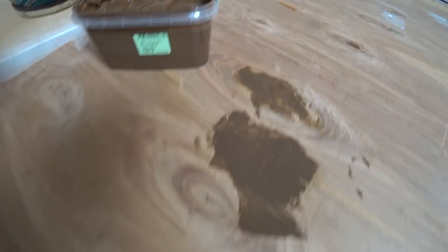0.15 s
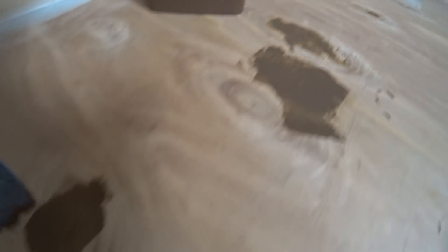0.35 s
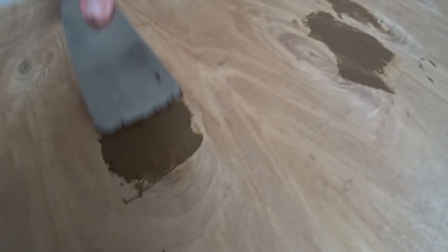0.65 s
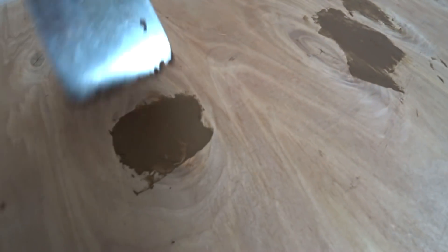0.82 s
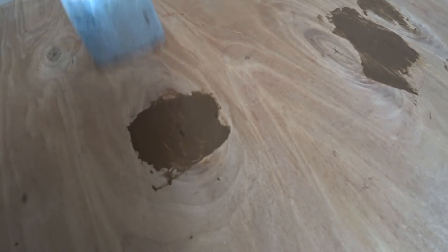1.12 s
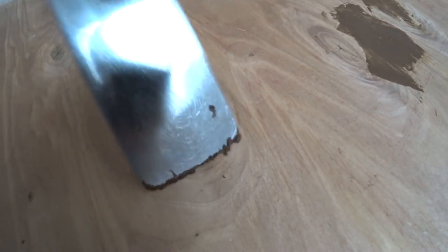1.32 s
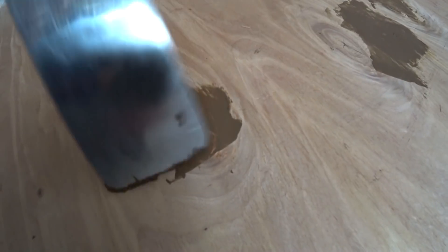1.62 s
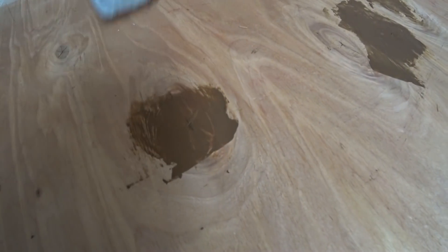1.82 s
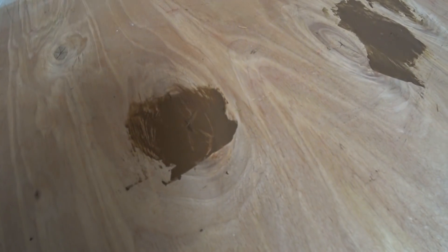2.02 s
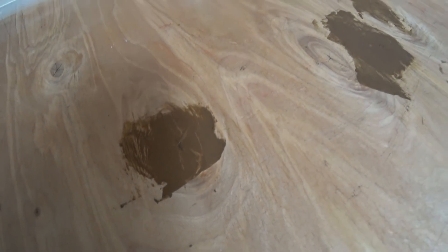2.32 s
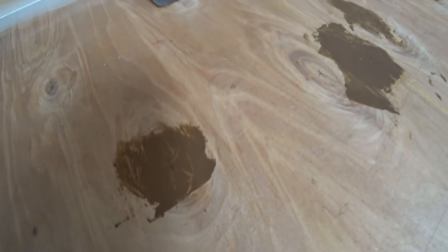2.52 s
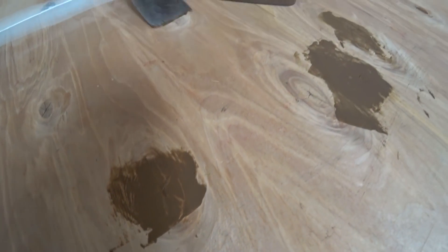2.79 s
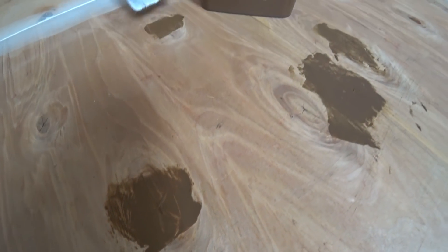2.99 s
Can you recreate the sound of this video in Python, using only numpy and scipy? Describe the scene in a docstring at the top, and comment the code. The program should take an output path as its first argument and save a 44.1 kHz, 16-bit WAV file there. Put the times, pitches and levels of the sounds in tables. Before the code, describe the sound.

A steel putty knife works filler into a wooden floor: nine clacking landings, each followed by a short gritty scrape. The first five are close to the stereo microphone; the last four sound roomier in a quiet bare room.

```python
"""A steel putty knife works filler into a wooden floor in a bare room, close to a stereo microphone.
Five strokes are near; four more landings, strong in the middle pitches, follow with more room in them,
most with a fading drag. Each landing rings board modes under a noisy clack; each drag is gritty noise
with sliding resonances, and a decaying tone marks the lift-off. Two edge snaps and a quiet hush
complete the place. A limiter holds the peaks down and a steep low-pass closes the top."""
import sys
import numpy as np
from scipy import signal
from scipy.fft import rfft, irfft, next_fast_len
from scipy.io import wavfile
from scipy.ndimage import uniform_filter1d, map_coordinates

SR = 44100
rng = np.random.default_rng(int(sys.argv[2]) if len(sys.argv) > 2 else 0)


def transcribe(signal):
    """Save signal, clipped to [-1, 1], as a 16-bit WAV file at the path in sys.argv[1]."""
    frames = np.atleast_2d(signal).T
    limited = np.clip(frames, -1, 1)
    pcm = np.round(limited * 32767).astype(np.int16)
    wavfile.write(sys.argv[1], SR, pcm)


N = 138915

# Blade landings: start_s, board_db, spot_hz (pitch the spot favours), spot_db, clack_db, room_db,
# left_right_db, bass_db, clack_tilt_db_per_octave, ring_length_ratio, upper_modes_db
LANDINGS = [(.0143, -28, 1320, 8, -12.5, -5, 7, -11, 3.5, .9, 3),
            (.5410, -24.5, 220, 4.5, -11, -12.5, 2.5, -1, 3.5, 0.64, 7.5),
            (.9422, -19, 670, 4.5, -11.5, -7.5, 2, 3, 4, 0.51, 6),
            (1.2930, -22.5, 345, 12.5, -18, -2.5, 2, 8, 1, 0.56, 1.5),
            (1.6054, -21, 356, 11, -11.5, -5, 2.5, 9, -1, 0.53, 3.5),
            (2.1189, -29, 842, 15, -15.5, -3, 1.5, -4, 5, 1.1, 0.5),
            (2.437, -27, 810, 17, -14, -0.5, 1, 0, 4.5, 0.79, 0.5),
            (2.7313, -26, 863, 14, -11, -0.5, 1, -6, 6, 0.9, 1.5),
            (3.0470, -32.5, 895, 20.5, -10.5, 4.5, 3.5, 5, 4, 0.71, -1.5)]
# Floorboard modes: pitch_hz, level_db, t60_s (before the ring length ratio), after_ring_db (re the mode)
BOARD_MODES = [(63, -19.5, 0.27, -28), (80, -21, .15, -30), (145, -15.5, 0.17, -20),
               (168, -12.5, 0.074, -27), (216.3, 4, 0.086, -34.5), (263, 0.5, 0.14, -22.5),
               (318, 1, 0.092, -23), (383.5, 0, 0.045, -17), (528, 0, 0.069, -27), (589, -3, 0.11, -27.5),
               (663, 2.5, 0.071, -22.5), (746.7, -2, 0.083, -20), (837, -12.5, 0.086, -22),
               (917, -10.5, 0.066, -20), (1148.6, 1, 0.044, -22), (1268, -3, 0.056, -33.5)]
# Share of a landing's bass gain: pitch_hz, share
BASS_SHARE = [(140, 0.51), (260, 0.023)]
# Share of a landing's upper-mode gain: pitch_hz, share
UPPER_SHARE = [(850, 0), (1100, 1)]
# Steel blade pressed on wood: pitch_hz, level_db, t60_s
BLADE_MODES = [(2420, -13.5, 0.011), (3180, -15.5, .03), (3964, -16, 0.077)]
# Noise spectrum of the clack: frequency_hz, level_db
CLACK_SPECTRUM = [(150, -23), (500, 10.5), (1200, -0.5), (1700, 1), (2600, -1), (4000, -6), (6000, -12.5),
                  (8000, -21), (11000, -29.5)]

# Drags: start_s, length_s, level_db at the start, after a third, after two thirds and at the end,
# left_right_db, resonances_db, resonance_pitch_ratio, tilt_db_per_octave, room_db
STROKES = [(0.06, 0.13, -32, -30.5, -28, -26, 4.5, -6, 0.95, 0.5, -8.5),
           (.563, 0.15, -24.5, -39, -32.5, -29, 2.5, -2, 1.07, 0, -9.5),
           (0.982, .120, -22.5, -21, -23, -23.5, 2.5, 0, 0.96, 0, -10),
           (1.333, 0.12, -23.5, -22.5, -25.5, -27, 2, -3, 1, 0.5, -10.5),
           (1.644, .120, -27.5, -24.5, -24.5, -22.5, 2.5, -1, 1.036, 1, -9),
           (2.153, 0.16, -36, -38.5, -38.5, -56, -11, -7, 0.81, .5, -1.5),
           (2.453, .150, -34.5, -30, -33.5, -40, 2, -14, 1.2, -0.5, -4.5),
           (2.744, 0.16, -28, -29.5, -36.5, -45, 1.5, -10, 1.0, .5, -2),
           (3.055, 0.095, -34, -29.5, -34, -28, 4, 2.5, 0.88, 2, 0.5)]
# Rasp of the paste: frequency_hz, level_db
RASP_SPECTRUM = [(30, -11.5), (110, -16.5), (220, -8.5), (355, 0.5), (490, -5.5), (730, -1), (900, -6.5),
                 (1150, -2), (1500, -5), (2100, -3), (3100, -11), (4100, -5.5), (4900, -8.5), (5800, -8),
                 (7300, -14), (8400, -14.5), (11000, -21)]
# Resonances that slide as the blade flattens, before a stroke's pitch ratio and gain:
# start_hz, turn_hz, end_hz, knots_per_s of the random envelope that widens them, level_db
SLIDING_MODES = [(2472, 2580, 1750, 260, -3.5), (3195, 3650, 2700, 420, -7), (5370, 5800, 5100, 700, -12.5)]

# Snaps of the blade's edge over grit: start_s, level_db
EDGE_SNAPS = [(2.1495, -8.5), (2.9948, -40.5)]
# Noise spectrum of a snap: frequency_hz, level_db
SNAP_SPECTRUM = [(300, -19), (2000, -8), (3800, -2), (6000, -3.5), (8000, -5.5), (11000, -5.5)]

# Decay of the bare room: frequency_hz, t60_s
ROOM_DECAY = [(100, 0.25), (260, 0.42), (700, 0.38), (1840, 0.4), (4850, 0.39), (11000, 0.35)]
# Left-right likeness of the room's answer: frequency_hz, correlation
ROOM_LIKENESS = [(100, 0.96), (500, 0.92), (1100, 0.59), (2500, 0.56), (5000, 0.66), (11000, 0.49)]
# Left-right likeness of the direct sound and the hush: frequency_hz, correlation
NEAR_LIKENESS = [(300, 0.79), (1100, 0.75), (2500, 0.77), (5000, 0.89), (11000, 0.47)]
# Share of the left-right level difference: frequency_hz, share
SIDE_SHARE = [(600, -0.047), (1100, -0.77), (2000, 1.58), (11000, 1.77)]
# Spectrum of the quiet place: frequency_hz, level_db
HUSH_SPECTRUM = [(25, 1.5), (60, -5), (150, -8.5), (500, -10.5), (2000, -19), (10000, -22.5)]

CONTACT_S = 0.00023  # time constant of the rise of a knock or snap
SPOT_OCTAVES = 0.49  # half-width, to 1/e of the dB gain, of the band a spot favours
AFTER_T60_S = 0.36  # the floor's slow after-ring
CLACK_T60_S, SNAP_T60_S = 0.022, 0.023
DRAG_HALF_ATTACK_S, DRAG_RELEASE_S = 0.014, 0.0093
SLIDE_TURN = 0.57  # share of the drag at which the slide turns
JUDDER_DB, JUDDER_KNOTS_PER_S = 1, 174.4
SWELL_DB, SWELL_KNOTS_PER_S = 0.9, 34.7
LIFT_HZ, LIFT_DB, LIFT_T60_S = 3810, -8, 0.064  # level re the end of the drag
GRITS_PER_S, GRIT_SPREAD, HISS_SHARE = 5000, 0.4, 0.6  # spread: log amplitude; hiss: re grit rms 1
PATCHY_DB = 2.6  # rms of the colour shifts
SNAP_PAN_DB, SNAP_ROOM_DB = 2, -5
TILT_PIVOT_HZ = 2000
ROOM_BUILD_S = 0.0027
HUSH_DB = -61
LIMIT_DB, RECOVER_DB_PER_S = -2, 120
TOP_HZ = 11130


def knocks(t):
    """The blade lands: a steel clack, and board modes weighted by the spot that is struck."""
    out = np.zeros((2, N))
    rise = 1 - np.exp(-t / CONTACT_S)
    for (start, board_db, spot_hz, spot_db, clack_db, room_db,
         pan_db, bass_db, tilt_db, ringing, upper_db) in LANDINGS:
        wood = np.zeros(len(t))
        for k, (hz, db, t60, after_db) in enumerate(BOARD_MODES):
            octaves_off = np.log2(hz / spot_hz)
            favour_db = spot_db * np.exp(-(octaves_off / SPOT_OCTAVES) ** 2)
            favour_db += bass_db * along(BASS_SHARE, hz) + upper_db * along(UPPER_SHARE, hz)
            mode_gain = (-1) ** k * amp(db + favour_db + rng.normal(0, 1))  # alternating polarity
            ring = amp(-60 * t / (ringing * t60)) + amp(after_db - 60 * t / AFTER_T60_S)
            wood += mode_gain * ring * np.sin(2 * np.pi * hz * t)
        steel = np.zeros(len(t))
        for hz, db, t60 in BLADE_MODES:
            phase = 2 * np.pi * hz * t + 0.5 * wobble(t, 420)  # the unsteady phase roughens the tone
            steel += amp(db - 60 * t / t60) * np.sin(phase)
        clack = coloured(rng.standard_normal((2, len(t))), CLACK_SPECTRUM, tilt_db)
        clack = clack * amp(-60 * t / CLACK_T60_S)
        blow = (amp(board_db) * wood + amp(clack_db) * (steel + clack)) * rise
        add(out, start, placed(blow, pan_db, room_db))
    return out


def drags(t):
    """The blade judders over the paste, its resonances slide, and it rings as it lifts."""
    out = np.zeros((2, N))
    age = t - DRAG_HALF_ATTACK_S
    for (start, length, start_db, early_db, late_db, end_db,
         pan_db, slide_db, pitch, tilt_db, room_db) in STROKES:
        rasp = coloured(grit(t), RASP_SPECTRUM, tilt_db)
        for start_hz, turn_hz, end_hz, knots_per_s, db in SLIDING_MODES:
            times = [0, SLIDE_TURN * length, length]
            hz = pitch * np.interp(age, times, [start_hz, turn_hz, end_hz])
            phase = 2 * np.pi * np.cumsum(hz) / SR
            band = wobble(t, knots_per_s) * np.sin(phase) + wobble(t, knots_per_s) * np.cos(phase)
            rasp = rasp + amp(db + slide_db) * unit(band)
        press = np.clip(t / (2 * DRAG_HALF_ATTACK_S), 0, 1)
        release = np.clip(1 - (age - length) / DRAG_RELEASE_S, 0, 1)
        uneven_db = JUDDER_DB * wobble(t, JUDDER_KNOTS_PER_S) + SWELL_DB * wobble(t, SWELL_KNOTS_PER_S)
        level_db = np.interp(age, np.linspace(0, length, 4), [start_db, early_db, late_db, end_db])
        force = press * release * amp(level_db + uneven_db)
        free = np.maximum(age - length, 0)  # seconds since the drag ended
        lift = amp(end_db + LIFT_DB - 60 * free / LIFT_T60_S) * np.sin(2 * np.pi * LIFT_HZ * free)
        add(out, start - DRAG_HALF_ATTACK_S, placed(force * unit(rasp) + lift, pan_db, room_db))
    return out


def grit(t):
    """Dense tiny slips on a smooth hiss; their colour shifts in patches as the paste gives way."""
    shape = (2, len(t))
    hits = rng.random(shape) < GRITS_PER_S / SR
    signs = np.sign(rng.standard_normal(shape))
    slips = hits * signs * np.exp(GRIT_SPREAD * rng.standard_normal(shape))
    z = signal.stft(unit(slips) + HISS_SHARE * rng.standard_normal(shape), nperseg=256)[2]
    patches = uniform_filter1d(rng.standard_normal(z.shape[1:]), size=4, axis=0)  # over frequency
    patches = uniform_filter1d(patches, size=7, axis=1)  # over time
    return signal.istft(z * amp(PATCHY_DB * unit(patches)), nperseg=256)[1][:, :len(t)]


def snaps(t):
    """The blade's edge snaps over grit: bright noise that rises at once and dies exponentially."""
    out = np.zeros((2, N))
    for start, db in EDGE_SNAPS:
        click = coloured(rng.standard_normal((2, len(t))), SNAP_SPECTRUM)
        click = click * amp(db - 60 * t / SNAP_T60_S) * (1 - np.exp(-t / CONTACT_S))
        add(out, start, placed(click, SNAP_PAN_DB, SNAP_ROOM_DB))
    return out


def placed(x, pan_db, room_db):
    """Level differs by side and frequency at the microphone, and the room answers in decaying noise."""
    n = x.shape[-1]
    hz, t, z = signal.stft(rng.standard_normal((2, n)), SR, nperseg=256)
    decay = amp(-60 * t / along(ROOM_DECAY, hz)[:, None])
    build = 1 - np.exp(-t / ROOM_BUILD_S)
    tail = signal.istft(z * decay * build, SR, nperseg=256)[1]
    tail = unit(stereo(tail, ROOM_LIKENESS)) / np.sqrt(n)  # about unit energy a side
    wet = signal.fftconvolve(x.mean(0)[None], tail, axes=1)[:, :n]
    direct = filtered(x, lambda f: amp(np.outer([0.5, -0.5], pan_db * along(SIDE_SHARE, f))))
    return direct + amp(room_db) * wet


def hush():
    """The quiet of the place: steady stereo noise, strongest in the bass."""
    return amp(HUSH_DB) * coloured(rng.standard_normal((2, N)), HUSH_SPECTRUM)


def coloured(pair, spectrum, tilt_db=0):
    """Near stereo sound of rms 1 with a given spectrum, tilted by so many dB an octave."""
    def gain(hz):
        octaves = np.log2(np.maximum(hz, TILT_PIVOT_HZ / 10) / TILT_PIVOT_HZ)
        return amp(along(spectrum, hz) + tilt_db * octaves)
    return unit(stereo(filtered(pair, gain), NEAR_LIKENESS))


def stereo(pair, likeness):
    """Mix two unrelated signals as mid and side, to left and right of a given correlation."""
    def mid_side(hz):
        turn = np.arccos(np.clip(along(likeness, hz), -1, 1)) / 2
        return np.array([np.cos(turn), np.sin(turn)])
    mid, side = filtered(pair, mid_side)
    return np.array([mid + side, mid - side])


def wobble(t, rate):
    """A smooth random curve, rate knots a second."""
    return map_coordinates(rng.standard_normal(2048), [t * rate], mode="wrap")


def filtered(x, response):
    """Multiply the spectrum of x by a response of frequency."""
    n = x.shape[-1]
    m = next_fast_len(n + SR // 10)  # padding for the filter's ringing
    return irfft(rfft(x, m) * response(np.fft.rfftfreq(m, 1 / SR)), m)[..., :n]


def along(points, hz):
    """Interpolate (Hz, value) points on a log frequency axis."""
    f, v = np.transpose(points)
    return np.interp(np.log(hz + 1), np.log(f + 1), v)


def amp(db):
    """Decibels to gain."""
    return 10 ** (np.asarray(db) / 20)


def unit(x):
    """Scale to rms 1."""
    return x / np.sqrt(np.mean(x ** 2) + 1e-20)


def add(track, start_s, x):
    """Mix x into the track at a time in seconds."""
    i = int(np.clip(round(start_s * SR), 0, N - 1))
    track[:, i:i + x.shape[-1]] += x[..., :N - i]


def scene():
    """Knocks, drags and snaps over the quiet of the room."""
    t = np.arange(SR * 3 // 4) / SR  # 0.75 s for each event
    return knocks(t) + drags(t) + snaps(t) + hush()


def record(dry):
    """A fast limiter, linked across the sides, that recovers steadily; then a steep low-pass."""
    over_db = np.maximum(20 * np.log10(np.abs(dry).max(0) + 1e-9) - LIMIT_DB, 0)
    recovery_db = RECOVER_DB_PER_S * np.arange(N) / SR
    cut_db = np.maximum.accumulate(over_db + recovery_db) - recovery_db
    cut_db = uniform_filter1d(cut_db, size=24)  # about half a millisecond
    return filtered(dry * amp(-cut_db), lambda hz: 1 / np.sqrt(1 + (hz / TOP_HZ) ** 200))


dry = scene()
out = record(dry)
transcribe(out)
```